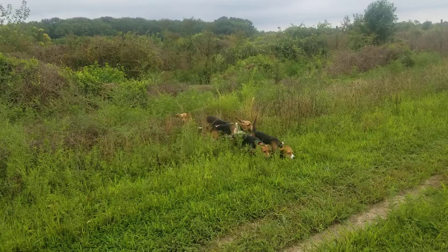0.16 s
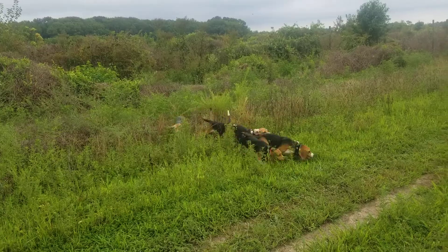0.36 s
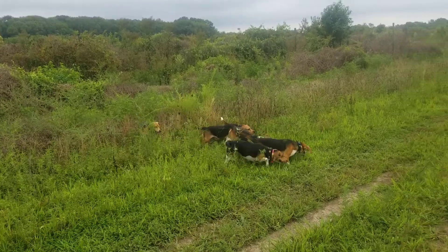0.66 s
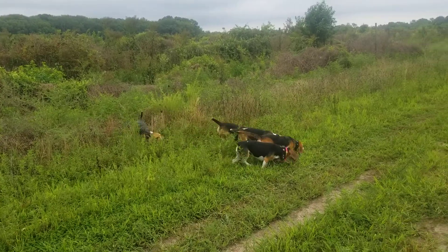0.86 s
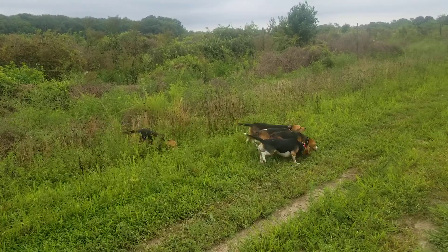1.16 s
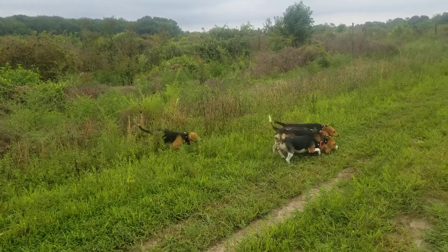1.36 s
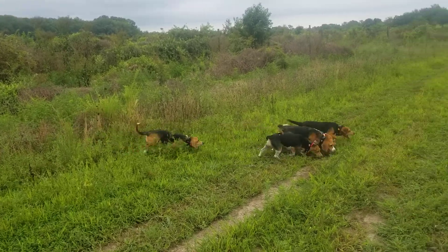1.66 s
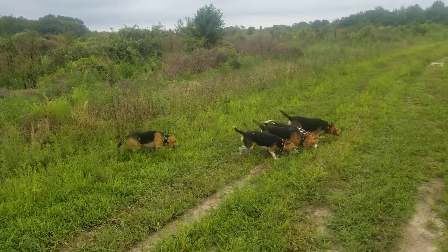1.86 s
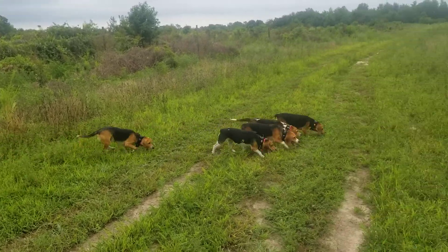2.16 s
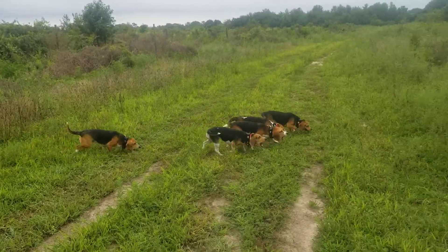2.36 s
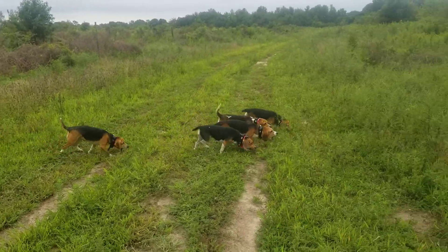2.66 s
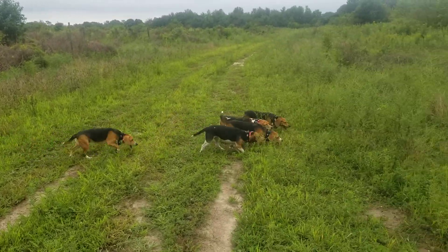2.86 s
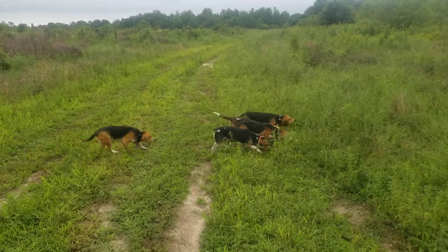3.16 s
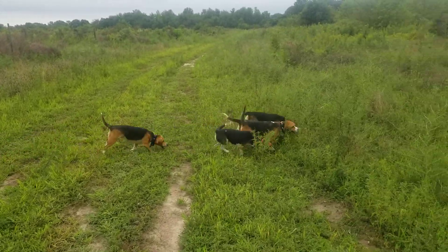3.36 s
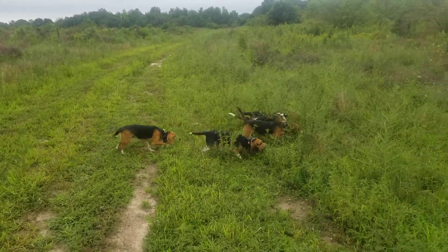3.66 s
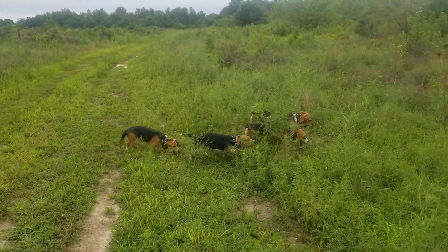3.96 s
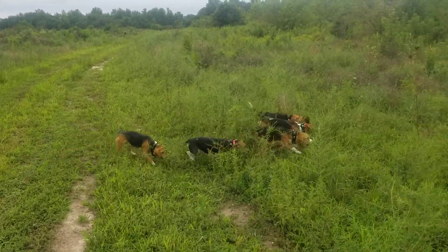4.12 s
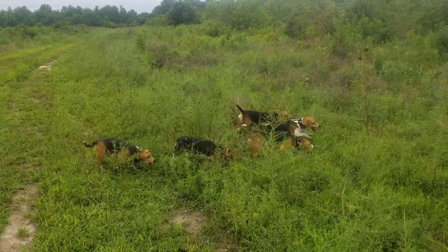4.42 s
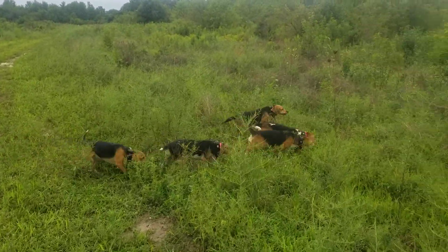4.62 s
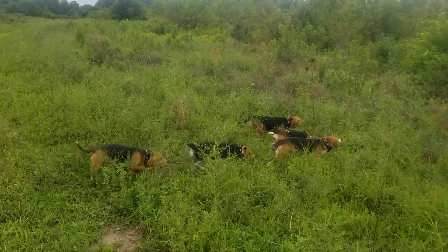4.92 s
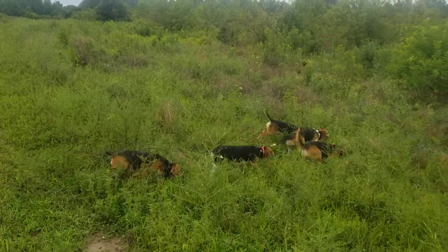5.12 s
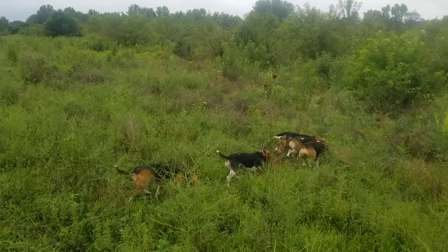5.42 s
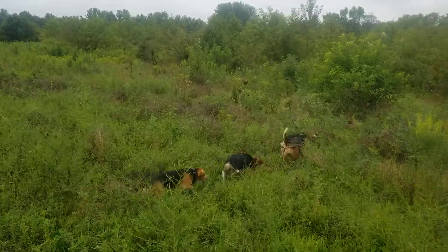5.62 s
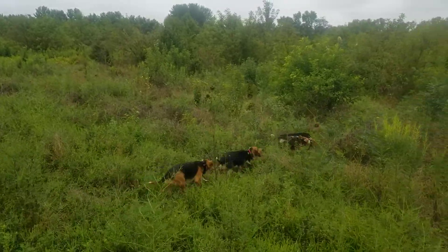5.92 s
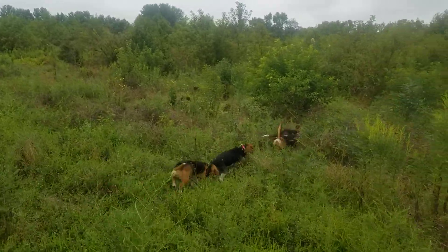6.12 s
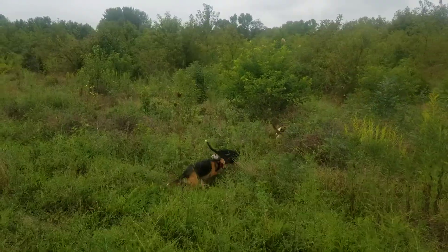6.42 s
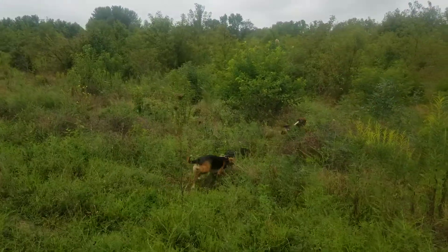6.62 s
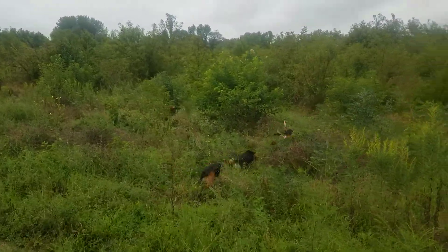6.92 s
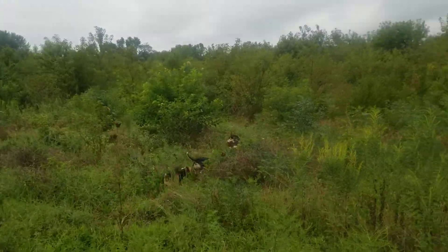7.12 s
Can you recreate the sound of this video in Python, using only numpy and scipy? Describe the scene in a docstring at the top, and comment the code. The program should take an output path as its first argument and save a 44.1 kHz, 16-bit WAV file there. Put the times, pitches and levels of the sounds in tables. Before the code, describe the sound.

A small pack of beagles bays excitedly several yards away in an open weedy field. Short, clear, mid-pitched notes scoop upward and overlap, soon alternating with hoarse, torn roars about twice a second. The calls are loudest between roughly one and a half and five and a half seconds, then weaker. Grass and brush give faint, quick echoes; low wind and thin hiss sit far beneath. Handheld stereo pickup, pack slightly right.

```python
"""A pack of beagles bays on a scent in an overgrown field, several yards away: clear, arching notes are
built from sine harmonics, and often break into hoarse roars made of a shaky pulse train and gusts of noise.
Short squeaks and groans are gliding tones; weeds, grass and far brush return the calls as decaying noise echoes.
Shaped noise makes the low wind, the hiss, the soft steps and a twig snap; a wandering sine is a distant hum."""
import sys
import numpy as np
from scipy import signal
from scipy.fft import rfft, irfft, next_fast_len
from scipy.io import wavfile
from scipy.ndimage import uniform_filter1d, minimum_filter1d, map_coordinates

SR = 44100
rng = np.random.default_rng(int(sys.argv[2]) if len(sys.argv) > 2 else 0)


def inscribe(sig):
    """Save sig as 16-bit PCM at rate SR to the path in sys.argv[1].

    A 1-D sig is mono; a 2-D sig holds one channel per row.
    Samples are clipped to [-1, 1] before scaling.
    """
    pcm = np.round(np.clip(np.atleast_2d(sig).T, -1, 1) * 32767)
    wavfile.write(sys.argv[1], SR, pcm.astype(np.int16))


N = 321038
T = np.arange(N) / SR

# clear notes of the pack, before their levels and pitch are shaped over time: start_s, length_s,
# first_pitch_hz, top_pitch_hz, swell_s, fundamental_db, octave_db, overtones_db, overtone_flare_s
BAY_NOTES = [(0.0, 0.15, 572, 600, 0.014, -19.5, -30.5, -39, 0.01),
             (0.184, 0.103, 557, 738, 0.079, -13.5, -24, -34.5, 0.042),
             (0.273, 0.095, 669, 696, 0.021, -16.5, -28.5, -58, 0.013),
             (0.57, 0.088, 625.4, 667.5, 0.026, -16, -24.5, -34, 0.016),
             (0.624, 0.16, 647, 693, 0.035, -19, -30, -40, 0.02),
             (0.872, 0.15, 530.0, 722.4, 0.08, -9.5, -28.5, -20, 0.039),
             (1.119, 0.06, 602.4, 715, 0.043, -12.5, -24.5, -39, 0.043),
             (1.177, 0.12, 672.5, 695.5, 0.014, -19.5, -20, -46, 0.19),
             (1.396, 0.16, 539, 608.7, 0.09, -9.5, -26, -42, 0.05),
             (1.659, 0.231, 575.0, 703.5, 0.072, -6, -26, -17, 0.032),
             (2.039, 0.15, 555.0, 698.7, 0.077, -7, -19.5, -25.5, 0.047),
             (2.349, 0.091, 667, 745, 0.063, -6.5, -18, -29, 0.027),
             (2.398, 0.126, 596.7, 684, 0.045, -8.5, -18.5, -22.5, 0.033),
             (2.671, 0.1, 597.4, 761, 0.047, -10.5, -23.0, -32.0, 0.03),
             (2.726, 0.15, 545, 680.0, 0.096, -6.5, -24, -28, 0.043),
             (3.08, 0.215, 494, 699.4, 0.105, -10, -25.0, -25, 0.071),
             (3.611, 0.112, 527.4, 713.0, 0.094, -9, -14.5, -24.5, 0.048),
             (3.868, 0.183, 466, 649, 0.059, -22.5, -38, -34, 0.092),
             (4.126, 0.11, 625, 730, 0.043, -22.5, -32, -41, 0.065),
             (4.227, 0.102, 648, 710, 0.013, -23, -29.5, -44.5, 0.015),
             (4.36, 0.147, 538.5, 700.6, 0.11, -9, -24.5, -21, 0.056),
             (4.43, 0.121, 640, 773, 0.023, -15.5, -24, -42, 0.15),
             (4.534, 0.06, 658.0, 678, 0.013, -19.5, -28.5, -39.5, 0.03),
             (4.894, 0.177, 523, 701.5, 0.11, -7.5, -27.5, -21, 0.1),
             (5.245, 0.17, 506, 699.6, 0.049, -21, -29, -47.5, 0.064),
             (5.441, 0.147, 558, 697.3, 0.09, -5, -23, -30.5, 0.045),
             (5.806, 0.07, 628, 666.6, 0.041, -18.5, -18, -25, 0.022),
             (5.836, 0.108, 613, 692, 0.032, -16.5, -19.5, -43, 0.021),
             (6.178, 0.16, 487.0, 694, 0.09, -13, -25.5, -25.0, 0.049),
             (6.33, 0.107, 686, 670, 0.02, -23.5, -32.0, -53, 0.12),
             (6.619, 0.14, 474.0, 699, 0.044, -21.5, -35, -48, 0.059),
             (6.757, 0.123, 532.7, 686, 0.045, -17.5, -20.5, -30, 0.041),
             (6.976, 0.11, 633, 762, 0.026, -18.5, -27.5, -39, 0.013),
             (7.213, 0.067, 570.5, 684, 0.072, -20, -21, -38.5, 0.026)]
# spells when a clear note breaks up: start_s, end_s, then levels relative to the note:
# period_doubling_db, rasp_db
VOICE_BREAKS = [(0.088, 0.134, -18, -9), (0.292, 0.348, -15, -48), (0.611, 0.723, -17.5, -8.5),
                (1.18, 1.3, -15, -22), (1.39, 1.548, -27.5, -24.5), (1.773, 1.865, -14, -58),
                (3.134, 3.289, -26.5, -22), (4.911, 4.956, -20, -15), (5.245, 5.392, -29, -11.5),
                (5.838, 5.954, -46, -18.5), (6.356, 6.425, -9, -20), (6.732, 6.854, -16, -14)]
# notes whose octave leaps out as they end, just before a roar: time_s, octave_boost_db
OCTAVE_CRACKS = [(2.88, 11.5), (3.3, 17.5), (4.05, 27.5), (4.6, 13.5), (6.43, 14)]
# how the throat favours the overtones (only the shape counts): frequency_hz, level_db
THROAT_SHAPE = [(1550, 10.5), (1800, 0.5), (2020, 2.5), (2280, -1), (2650, 1.5), (2950, -8.5),
                (3400, -24.5), (3900, -34.5), (5500, -37), (14000, -40.5)]
# colour of the hoarse voice (only the shape counts): frequency_hz, level_db (per Hz)
HOARSE_COLOUR = [(250, -48), (400, -34), (500, -13.5), (580, -5.5), (700, 2), (850, -16), (1000, -9),
                 (1130, -8), (1500, -19), (1980, -16.5), (2600, -31), (4300, -38.5), (9000, -59.5),
                 (14000, -75)]
# squeaks as the vocal folds first catch: time_s, level_db
SQUEAK_EVENTS = [(0, -13), (1.407, -11), (3.14, -15.5), (3.882, -19), (4.35, -16), (4.42, -17.5),
                 (4.898, -16.5), (5.253, -20.5), (5.445, -26), (7.166, -32)]
# colour of the hiss around the calls (only the shape counts): frequency_hz, level_db (per Hz)
HISS_COLOUR = [(1500, -23), (4300, -3), (5600, -9), (8000, -5.5), (10000, -17.5), (12500, -8.5),
               (15000, -12.5)]
# colour of the wind and grass (only the shape counts): frequency_hz, level_db (per Hz)
FIELD_COLOUR = [(20, -22), (52, -2.5), (75, -6.5), (120, -3.5), (200, -9.5), (330, -15.5), (700, -12),
                (1500, -19), (3300, -23.5), (4400, -19), (5600, -26.5), (7200, -14), (10000, -35.5),
                (12500, -23), (15000, -35)]
# how much the wind differs between left and right: frequency_hz, side_db
FIELD_WIDTH = [(30, -8.5), (120, -14.5), (400, -5), (2000, -0.5), (5000, 0.5)]
# slow rise and fall of the wind: time_s, level_db
BREEZE = [(0, 0.31), (2, 1.0), (3.5, -0.27), (5, 0.86), (7.2, -0.5)]
# low groans that tumble in pitch: time_s, level_db
GROAN_EVENTS = [(1.305, -43.5), (3.775, -52), (6.095, -44.5)]
# soft steps in the grass close by: time_s, level_db
STEP_EVENTS = [(2.079, -59.5), (7.11, -42), (7.161, -46)]
# colours of the steps and the snapping stalk (only the shape counts): frequency_hz, level_db
STEP_COLOUR = [(40, -23.5), (170, -11.0), (400, -13.5), (1500, -26), (12000, -42)]
TWIG_COLOUR = [(300, -7.5), (2500, -2.5), (14000, -7.5)]
# hoarse roars, before their levels are shaped over time: start_s, length_s, chest_db, mouth_db
ROAR_CALLS = [(2.418, 0.16, -16, -15), (2.876, 0.099, -14, -20.0), (3.29, 0.1, -14.5, -16.0),
              (3.668, 0.093, -12.5, -19), (4.045, 0.111, -14.5, -15), (4.593, 0.13, -18.5, -20.5),
              (5.041, 0.12, -17, -22.5), (5.514, 0.12, -21, -24), (5.951, 0.142, -23.5, -20.5),
              (6.428, 0.104, -21.5, -27), (6.842, 0.12, -21, -26), (7.24, 0.076, -21, -27)]
# how weeds and brush colour the sound they return: frequency_hz, level_db
WEEDS_COLOUR = [(600, 1), (1300, 8.5), (4000, 22.8)]
BRUSH_COLOUR = [(1300, 6), (3000, -13)]
# difference in colour between the two channels: frequency_hz, left_minus_right_db
STEREO_TILT = [(250, 1), (600, 1.2), (1300, -2), (2400, 2), (5000, -3.5), (9000, -3.5)]

TOP_HZ = 14800  # nothing passes above this
HUM_HZ = 110.7  # centre of the wandering hum
# the pitch scoops up, helped by this share of the swell time, then drops by this share as the note ends
GLIDE_S, GLIDE_SHARE, DROP, DROP_S = 0.028, 0.2, 0.22, 0.01036
# each part of a bay starts this far down, then sags
ONSET_DB, SAG_DB_PER_S = 30, 39
OCTAVE_ONSET_DB, OCTAVE_SWELL_S, OCTAVE_SAG_DB_PER_S = 7, 0.045, 44.5
UPPER_ONSET_DB, UPPER_SAG_DB_PER_S = 11.5, 234  # the overtones flare early and dull quickly
FLARE_DB_PER_S = 160.5  # slow flares start from further down
RELEASE_DB, RELEASE_S = 15, 0.015  # the whole voice dies away at the end
CRACK_S = 0.033  # how long before its end a note cracks
# the chest tone of a roar builds up and collapses; its bright mouth sound fades less at the end
ROAR_BUILD_DB, ROAR_BUILD_S = 5.5, 0.081
ROAR_RELEASE_DB, ROAR_RELEASE_S = 21, 0.0316
MOUTH_SAG_DB_PER_S, MOUTH_RELEASE_DB = 24.5, 3


def amp(db):
    """Turn decibels into gain."""
    return 10 ** (np.asarray(db) / 20)


def unit(x):
    """Scale to an rms of 1."""
    return x / np.sqrt(np.mean(x ** 2) + 1e-20)


def along(points, hz):
    """Read a curve of (frequency, value) points on a log frequency axis."""
    f, v = np.transpose(points)
    return np.interp(np.log(hz + 1), np.log(f + 1), v)


def wobble(rate, size=N):
    """Draw a smooth random curve through this many random points a second."""
    knots = rng.standard_normal(int(size * rate / SR) + 4)
    return map_coordinates(knots, [np.arange(size) * rate / SR], mode="nearest")


def filtered(x, response):
    """Multiply the spectrum of x by a response that depends on frequency."""
    m = next_fast_len(N + 8192)
    return irfft(rfft(x, m) * response(np.fft.rfftfreq(m, 1 / SR)), m)[..., :N]


def noise(colour, channels=1):
    """Coloured noise with an rms of 1."""
    white = rng.standard_normal((channels, N))
    return unit(filtered(white, lambda hz: amp(along(colour, hz))))


def gate(t, start, end, fade):
    """Open at start and shut at end, with soft edges."""
    inside = np.minimum(t - start, end - t)
    return np.sin(np.pi / 2 * np.clip(inside / fade + 0.5, 0, 1)) ** 2


def call(start, length, fade):
    """The samples a call covers, its gate, the time since its start and the time until its end."""
    at = np.flatnonzero((T > start - fade) & (T < start + length + fade))
    age = np.clip(T[at] - start, 0, length)
    return at, gate(T[at], start, start + length, fade), age, length - age


def swell(age, depth_db, rise_s, sag_db_per_s):
    """A level in dB that rounds up to 0 and then sags."""
    rise_db = -depth_db * np.maximum(1 - age / rise_s, 0) ** 2
    return rise_db - sag_db_per_s * np.maximum(age - rise_s, 0)


def arch(age, left, crack_db, first_hz, top_hz, swell_s, first_db, octave_db, upper_db, flare_s):
    """Pitch and levels of a bay: it scoops up bright, mellows, then drops away or cracks into its octave."""
    drops = crack_db == 0
    pitch = top_hz + (first_hz - top_hz) * np.exp(-age / (GLIDE_S + GLIDE_SHARE * swell_s))
    pitch = pitch * (1 - DROP * drops * np.exp(-left / DROP_S))
    release = RELEASE_DB * np.exp(-left / RELEASE_S)
    crack = crack_db * np.exp(-(left / CRACK_S) ** 4)
    ending = crack - drops * release
    first_db = first_db + swell(age, ONSET_DB, swell_s, SAG_DB_PER_S) - release - crack / 2
    octave_db = octave_db + swell(age, OCTAVE_ONSET_DB, OCTAVE_SWELL_S, OCTAVE_SAG_DB_PER_S) + ending
    flare_depth_db = UPPER_ONSET_DB + FLARE_DB_PER_S * flare_s
    upper_db = upper_db + swell(age, flare_depth_db, flare_s, UPPER_SAG_DB_PER_S) + ending / 2
    return pitch, first_db, octave_db, upper_db


def bays(jitter=0.0014, waver=0.012, shimmer_db=1.53, drift_db=5.0, break_unrest=1.14,
         rasp_db=-39, catch_db=-20, count=14):
    """Evenly vibrating vocal folds: a strong fundamental, its octave and overtones shaped by the throat."""
    out, turbulence = np.zeros(N), noise(HOARSE_COLOUR)[0]
    doubling, rasp, unrest = np.zeros(N), np.full(N, amp(rasp_db)), np.ones(N)
    for start, end, doubling_db, break_rasp_db in VOICE_BREAKS:
        doubling += amp(doubling_db) * gate(T, start, end, 0.0024)
        rasp += amp(break_rasp_db) * gate(T, start, end, 0.0059)
        # a breaking voice wavers and shakes far more than a clear one
        unrest += break_unrest * gate(T, start, end, 0.014)
    k = np.arange(1, count + 1)[:, None]  # harmonic numbers
    for start, length, *shape in BAY_NOTES:
        at, sounding, age, left = call(start, length, fade=0.016)
        n = len(at)
        crack_db = sum(db for s, db in OCTAVE_CRACKS if abs(start + length - s) < CRACK_S)
        pitch, first_db, octave_db, upper_db = arch(age, left, crack_db, *shape)
        slow_waver = unrest[at] * waver * wobble(54.9, n)
        fast_jitter = (jitter + 0.05 * rasp[at]) * wobble(500, n)
        pitch = uniform_filter1d(pitch, size=700, mode="nearest") * (1 + slow_waver + fast_jitter)
        phase = 2 * np.pi * np.cumsum(pitch) / SR
        # overtones flare as they glide through the throat's resonances
        upper = amp(along(THROAT_SHAPE, k[2:] * pitch))
        upper *= amp(upper_db) / np.linalg.norm(upper, axis=0)
        sizes = np.vstack([amp(first_db), amp(octave_db), upper])
        # running shakes the voice, the overtones more than the fundamental
        shake_db = np.array([drift_db * unrest[at] * np.tanh(wobble(62.7, n)) + shimmer_db * wobble(350, n)
                             for _ in k])
        shake_db *= np.minimum(k ** 0.5 * 0.45, 1.2)
        voice = np.sum(sizes * amp(shake_db) * np.sin(k * phase), axis=0)
        # alternate strong and weak cycles put lines halfway between the harmonics
        faint_halves = np.sin(phase / 2) + np.sin(5 * phase / 2) + np.sin(7 * phase / 2)
        halves = np.sin(3 * phase / 2) + 0.03 * faint_halves
        effort = np.linalg.norm(sizes, axis=0)
        tone = np.sqrt(2) * (voice + effort * doubling[at] * halves)
        # each note starts with a throaty puff before the folds lock in
        puff = effort.max() * amp(catch_db) * np.exp(-np.abs(T[at] - start) / 0.022)
        air = effort * rasp[at] + puff
        out[at] += sounding * (tone + air * turbulence[at])
    return out


def slides(events, start_hz, end_hz, length, jitter):
    """Short tones whose pitch falls steadily, with a random shake."""
    out = np.zeros(N)
    for s, db in events:
        at, sounding, age, _ = call(s, length, fade=length / 2)
        pitch = start_hz + (end_hz - start_hz) * age / length
        pitch = pitch * (1 + jitter * wobble(400, len(at)))
        out[at] += amp(db) * sounding * np.sin(2 * np.pi * np.cumsum(pitch) / SR)
    return out


def squeaks():
    """Tiny high, shaky tones as the vocal folds first catch."""
    return slides(SQUEAK_EVENTS, start_hz=880, end_hz=804, length=0.019, jitter=0.089)


def hiss(pack, air_db=-41):
    """A thin, uneven hiss that swells with the calls."""
    loudness = np.sqrt(np.abs(uniform_filter1d(pack ** 2, size=1800)))
    # the power below 1 makes the hiss swell less than the calls do
    return amp(air_db + 3.5 * wobble(25)) * loudness ** 0.53 * noise(HISS_COLOUR, channels=2)


def scatter(x, t60, delay, count=16):
    """Blurred echoes, different left and right and changing as the hounds move through the field."""
    t = np.arange(SR // 2) / SR
    out, hop = np.zeros((2, N + SR)), N // count + 1
    # overlapping pieces of sound each get a fresh random echo tail
    for centre in range(0, N + hop, hop):
        at = np.arange(max(centre - hop, 0), min(centre + hop, N))
        piece = x[at] * np.cos(np.pi / 2 * (at - centre) / hop)
        tail = rng.standard_normal((2, len(t))) * amp(-60 * t / t60) * (1 - np.exp(-t / delay))
        tail /= np.linalg.norm(tail, axis=1, keepdims=True)
        echo = signal.fftconvolve(piece[None], tail, axes=1)
        out[:, at[0]:at[0] + echo.shape[1]] += echo
    return out[:, :N]


def field(field_db=-53, hum_db=-64):
    """Wind rumble and rustling grass, most alike left and right in the bass, with a distant hum."""
    mid, side = noise(FIELD_COLOUR, channels=2)
    side = filtered(side, lambda hz: amp(along(FIELD_WIDTH, hz)))
    breeze_db = np.interp(T, *np.transpose(BREEZE))
    wind = amp(field_db + breeze_db + 0.63 * wobble(19)) * np.array([mid + side, mid - side])
    hum_tone = np.sqrt(2) * np.sin(2 * np.pi * np.cumsum(HUM_HZ + wobble(1.2)) / SR)
    return wind + amp(hum_db + 0.9 * wobble(8.9)) * hum_tone


def groans():
    """Low tones that tumble quickly in pitch."""
    return slides(GROAN_EVENTS, start_hz=403, end_hz=178, length=0.038, jitter=0.04)


def steps(decay=0.4):
    """Dull thuds with a little rustle: noise that rises quickly and dies away slowly."""
    push = np.zeros(N)
    for s, db in STEP_EVENTS:
        fall_s = np.where(T < s, 0.03, 2 * decay)  # time for a 60 dB change, before and after the peak
        push += amp(db - 60 * np.abs(T - s) / fall_s)
    return push * noise(STEP_COLOUR)


def roars(start_hz=620, end_hz=550, sag=0.045, jitter=0.05, tear_db=3, calm_db=-12, wild_db=-1,
          split_hz=880, droop=0.1, count=4):
    """Overblown folds slap at a sagging pitch: chaotic when driven hard, more tonal as the push fades."""
    out, rough, pitch = np.zeros(N), np.zeros(N), np.full(N, float(end_hz))
    controls = []
    for start, length, chest_db, mouth_db in ROAR_CALLS:
        at, sounding, age, left = call(start, length, fade=0.02)
        spent = np.maximum(1 - left / ROAR_RELEASE_S, 0)
        chest_db = chest_db + swell(age, ROAR_BUILD_DB, ROAR_BUILD_S, 0) - ROAR_RELEASE_DB * spent
        mouth_db = mouth_db - MOUTH_SAG_DB_PER_S * age - MOUTH_RELEASE_DB * spent
        controls.append((at, sounding, chest_db, mouth_db))
        pitch[at] = end_hz + (start_hz - end_hz) * np.exp(-(T[at] - T[at[0]]) / sag)
        # the pitch drops away as the air runs out
        pitch[at] *= 1 - droop * np.exp((T[at] - T[at[-1]]) / 0.025)
        push_db = chest_db - chest_db.max()
        rough[at] = np.clip((push_db - calm_db) / (wild_db - calm_db), 0.3, 1)
    unsteady = rough * (jitter * wobble(450) + 0.027) + 0.045 * wobble(45)
    phase = 2 * np.pi * np.cumsum(pitch * (1 + unsteady)) / SR
    slaps = sum(np.cos(k * phase) for k in range(1, count + 1))
    # air rushes through once a cycle, while the folds are open
    rush = unit(rng.standard_normal(N) * (1 + np.cos(phase)))
    tearing = amp(tear_db * rough * np.tanh(wobble(260) + wobble(90)))
    source = (unit(slaps) + 2.2 * rough * rush) * tearing
    voice = filtered(source, lambda hz: amp(along(HOARSE_COLOUR, hz)))
    low = filtered(voice, lambda hz: 1 / (1 + (hz / split_hz) ** 10))
    chest, mouth = unit(low), unit(voice - low)
    for at, sounding, chest_db, mouth_db in controls:
        out[at] += sounding * (amp(chest_db) * chest[at] + amp(mouth_db) * mouth[at])
    return out


def twig(s=7.105, peak_db=-41, t60=0.008):
    """A dry stalk snaps in the grass nearby: a sudden burst of noise that dies at once."""
    burst = (T >= s) * amp(peak_db - 60 * np.abs(T - s) / t60)
    return burst * noise(TWIG_COLOUR, channels=2)


def scene(lag=0.00006, near_db=-15, grass_db=-25, echo_db=-34):
    """The pack, a little to the right, with its echoes from weeds, grass and far brush, in the field."""
    pack = bays() + roars() + squeaks() + groans()
    # the right channel hears the pack first, by lag seconds
    direct = filtered(pack, lambda hz: np.exp(1j * np.pi * hz * lag * np.array([[-1], [1]])))
    weeds = filtered(scatter(pack, t60=0.009, delay=0.0013), lambda hz: amp(along(WEEDS_COLOUR, hz)))
    grass = scatter(pack, t60=0.026, delay=0.003)
    brush = filtered(scatter(pack, t60=0.2, delay=0.18), lambda hz: amp(along(BRUSH_COLOUR, hz)))
    echoes = amp(near_db) * weeds + amp(grass_db) * grass + amp(echo_db) * brush
    return direct + echoes + hiss(pack) + steps() + twig() + field()


def record(dry):
    """Colour the two channels differently, hold down the loudest peaks and cut everything above TOP_HZ."""
    x = filtered(dry, lambda hz: amp(along(STEREO_TILT, hz) * np.array([[0.5], [-0.5]])))
    needed = 0.97 / np.maximum(np.abs(x).max(axis=0), 0.97)
    # the gain dips around each peak, smoothly and together in both channels
    gain = uniform_filter1d(minimum_filter1d(needed, size=500), size=400)
    return filtered(x * gain, lambda hz: hz < TOP_HZ)


dry = scene()
out = record(dry)
inscribe(out)
```